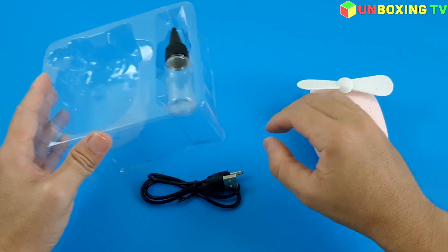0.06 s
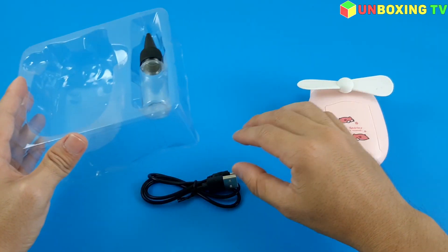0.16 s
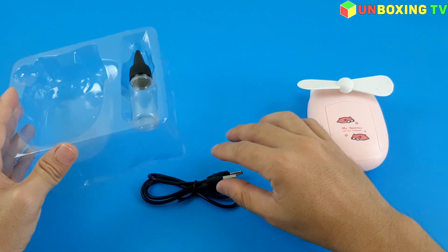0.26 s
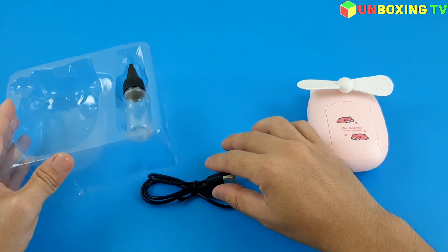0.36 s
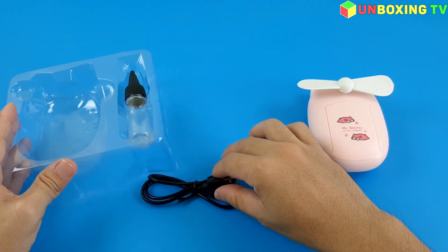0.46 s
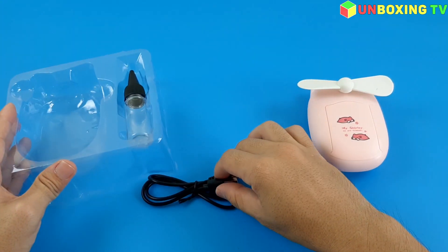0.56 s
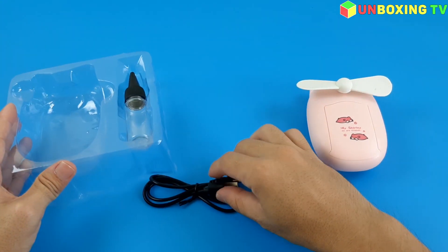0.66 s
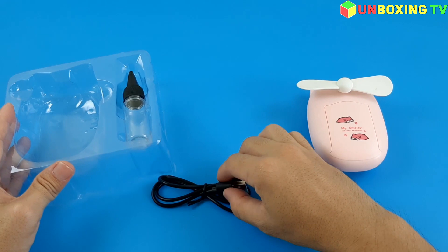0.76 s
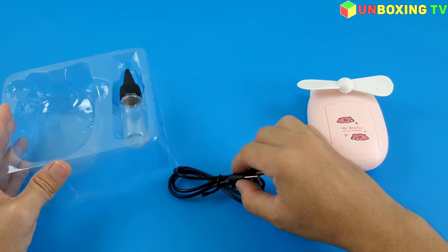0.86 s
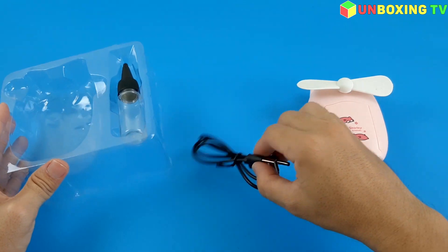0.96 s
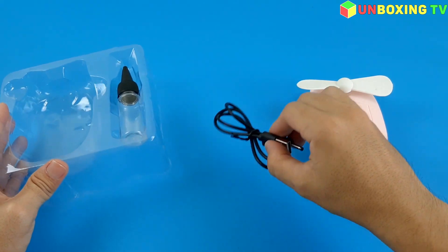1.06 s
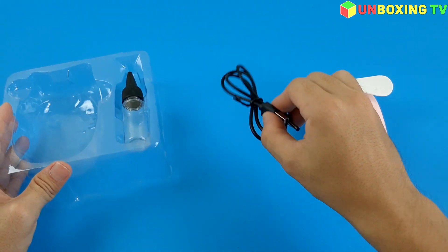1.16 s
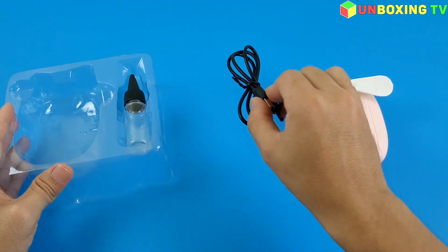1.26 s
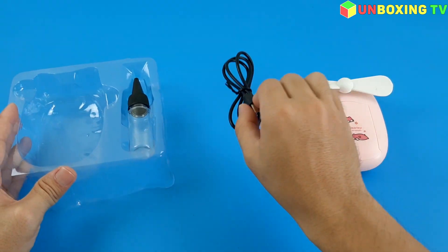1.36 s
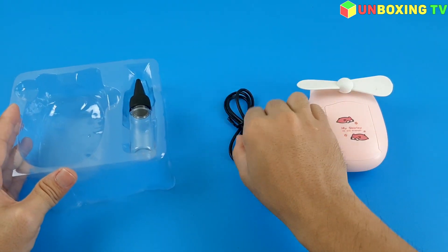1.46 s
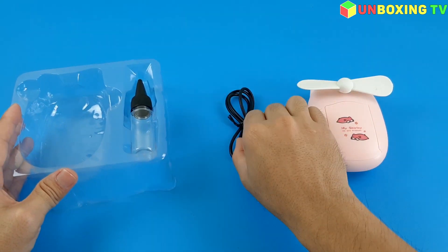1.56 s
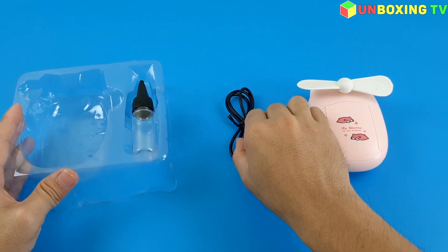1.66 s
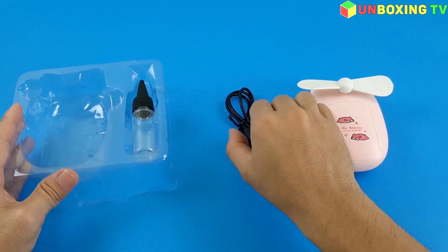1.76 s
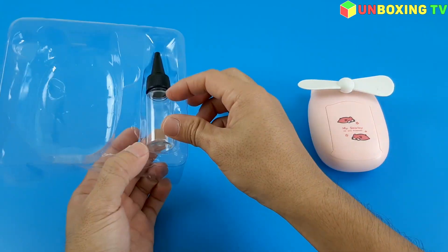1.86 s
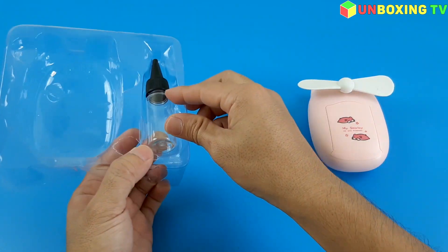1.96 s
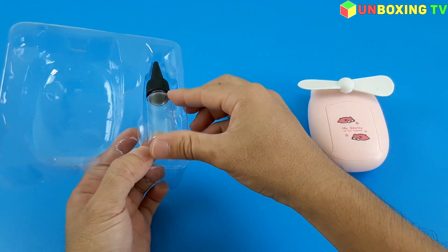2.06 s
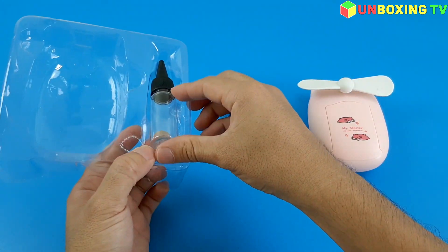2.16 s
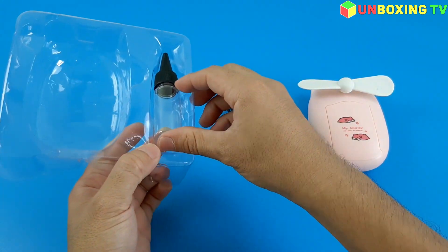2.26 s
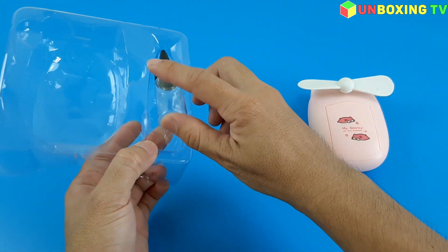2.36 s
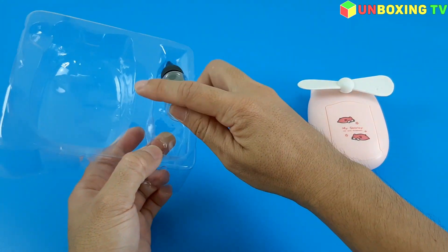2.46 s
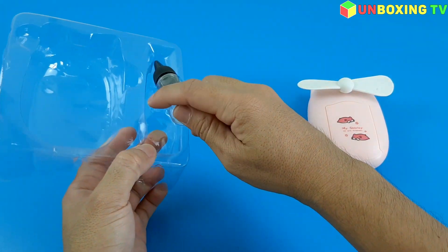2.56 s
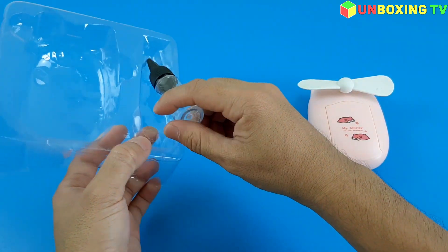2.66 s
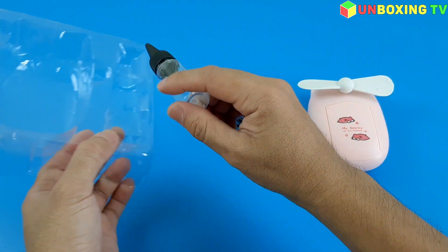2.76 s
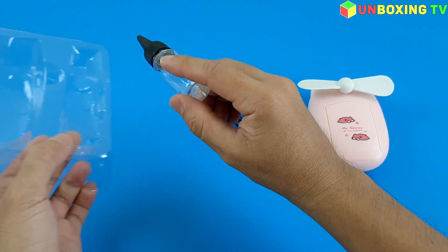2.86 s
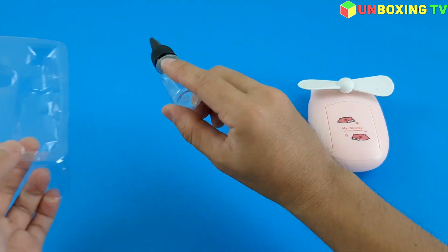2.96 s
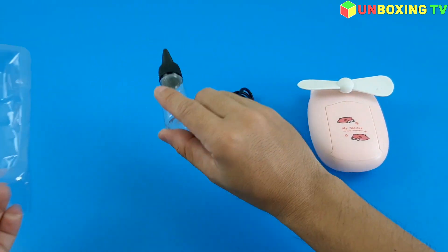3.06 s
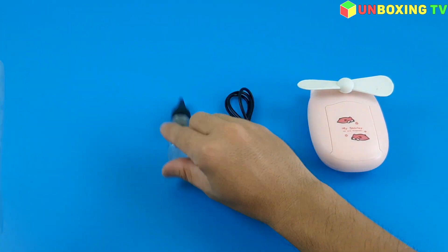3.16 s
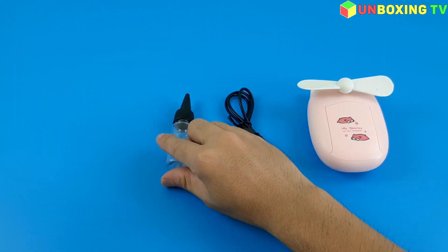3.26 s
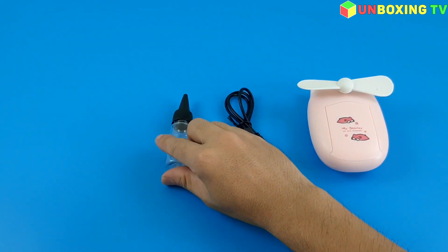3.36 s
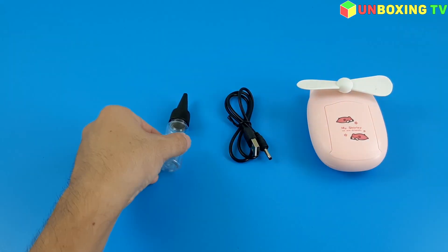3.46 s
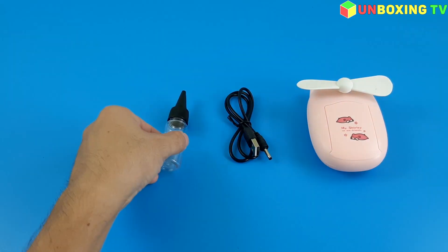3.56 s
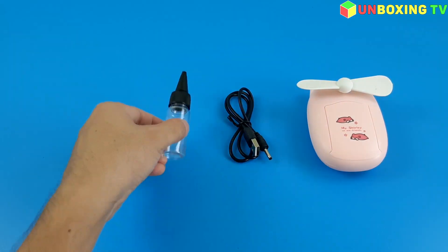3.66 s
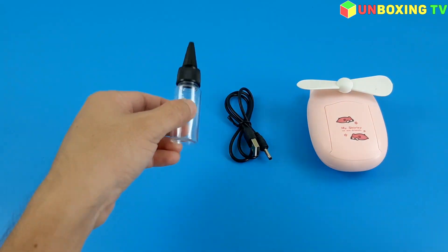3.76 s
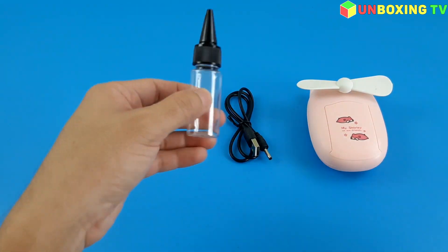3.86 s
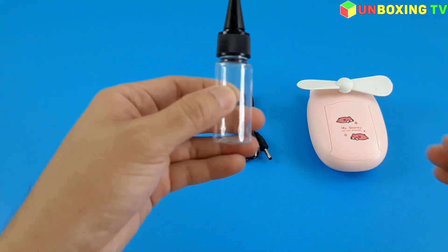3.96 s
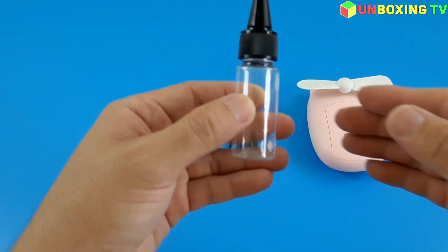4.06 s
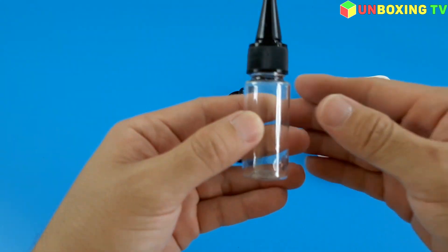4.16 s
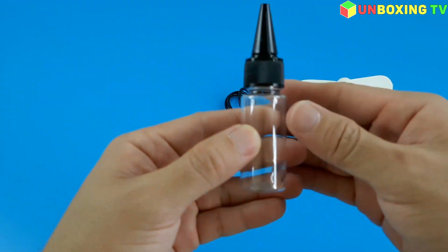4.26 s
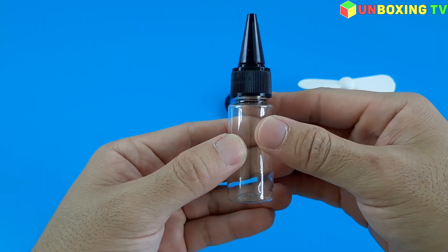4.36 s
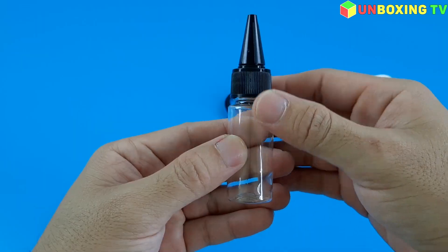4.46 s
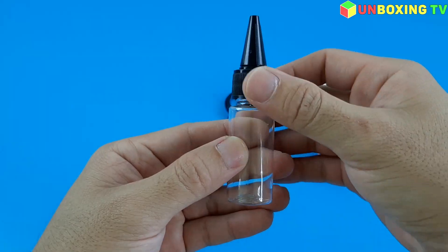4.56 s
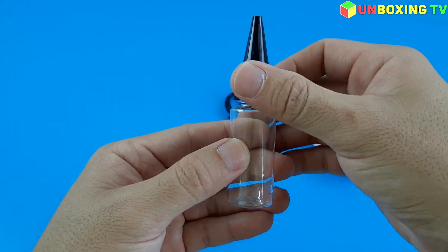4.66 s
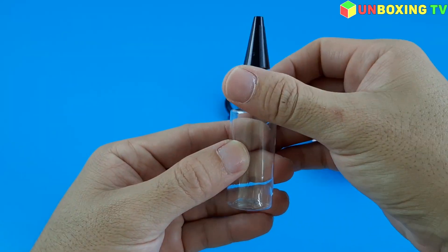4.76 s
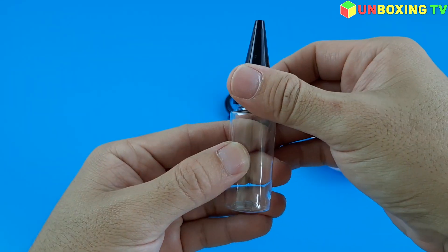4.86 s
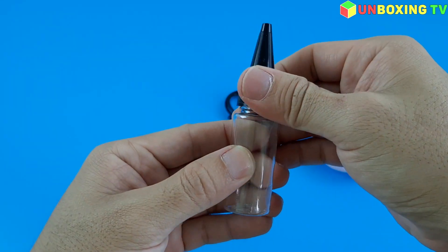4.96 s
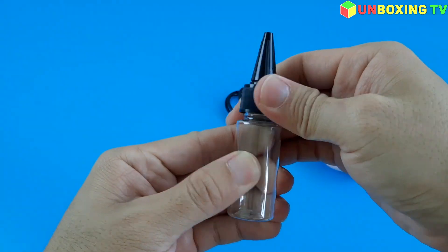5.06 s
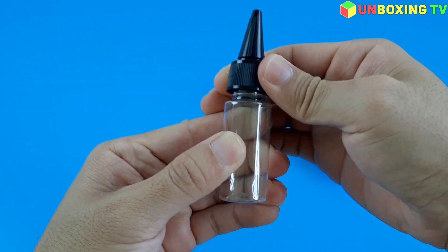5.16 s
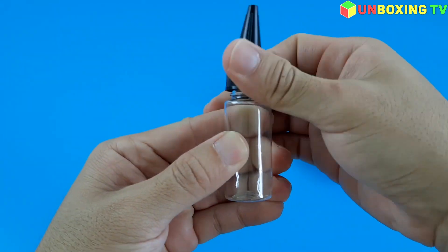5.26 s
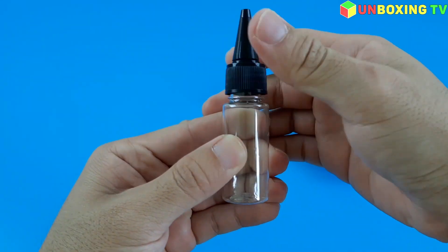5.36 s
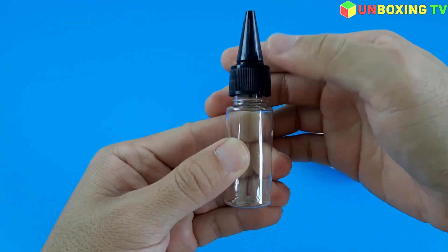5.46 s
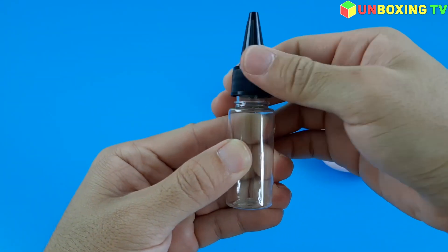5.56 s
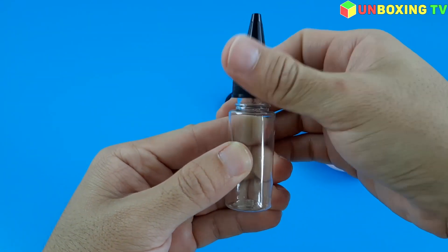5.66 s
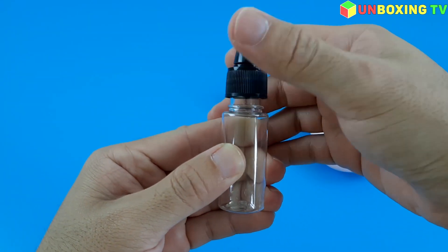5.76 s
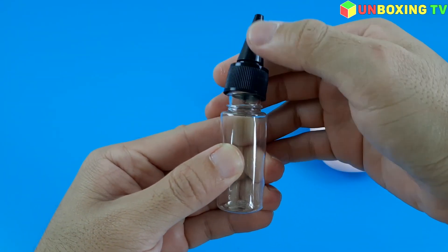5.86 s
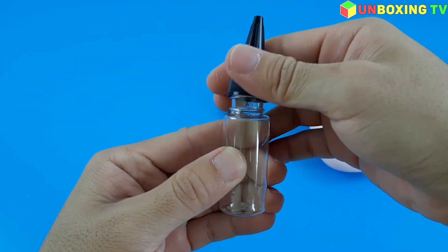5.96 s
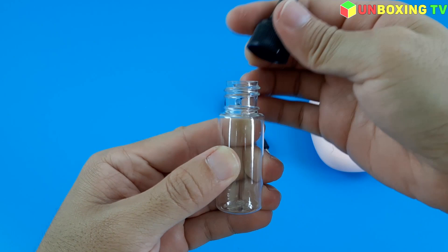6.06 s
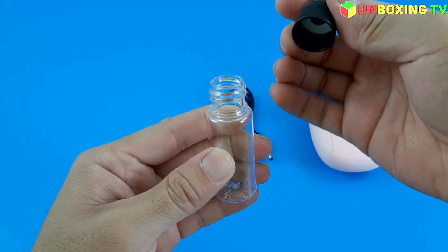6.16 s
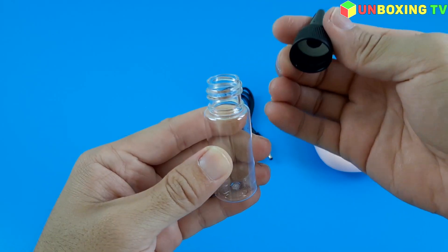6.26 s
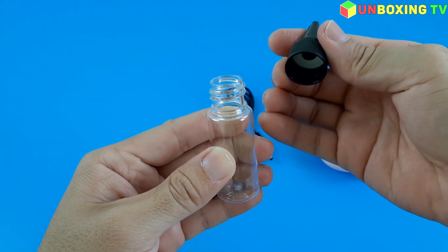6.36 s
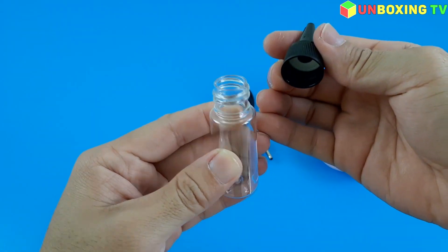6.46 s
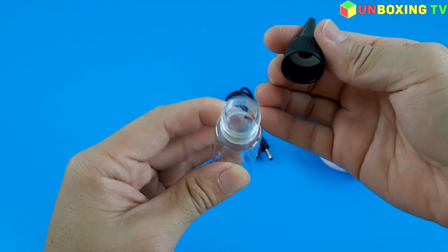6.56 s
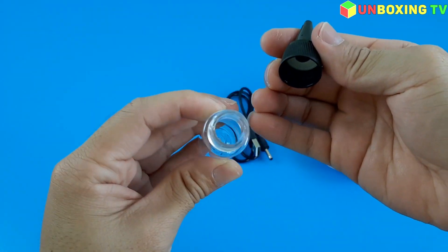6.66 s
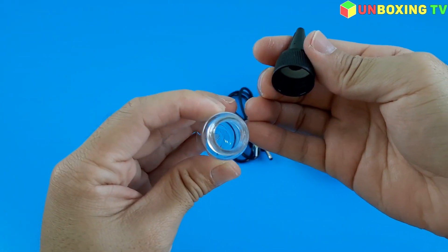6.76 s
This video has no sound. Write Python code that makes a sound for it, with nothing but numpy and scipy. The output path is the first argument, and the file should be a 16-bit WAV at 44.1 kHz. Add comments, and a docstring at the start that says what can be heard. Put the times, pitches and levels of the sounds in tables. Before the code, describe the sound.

Close to the microphone, a thin plastic tray crackles and snaps in irregular bursts, growing denser and louder as a small bottle is worked out of it. The bottle is set down on the table with a sharp knock. After a pause, its plastic cap is unscrewed in steps, ticking along the thread with faint finger rubbing. The room is hard and echoing, with distant traffic rumble and light hiss behind.

```python
"""Far traffic and microphone hiss, then close by, on a table in a hard, echoing room, a thin plastic
tray snaps, buckles and rustles in the hands; each crack rings the film, its wells and the table top.
A small bottle is set down, then its cap is turned off in steps, ticking along the thread.
One echo stops short. During the unscrewing the echo dies twice as fast, and echo, traffic and hiss
sit about an octave higher."""
import sys
import numpy as np
from scipy import signal
from scipy.fft import rfft, irfft
from scipy.io import wavfile

SR = 44100
rng = np.random.default_rng(int(sys.argv[2]) if len(sys.argv) > 2 else 0)


def dump(signal):
    """Clip the signal to [-1, 1] and save it as 16-bit WAV at the path in sys.argv[1]."""
    limited = np.clip(np.atleast_2d(signal).T, -1, 1)
    pcm = np.round(limited * 32767).astype(np.int16)
    wavfile.write(sys.argv[1], SR, pcm)


N = 300762
TIME = np.arange(N) / SR

# Snaps and knocks at the table; level_db sets the middle bands, the three colours are relative to it:
# start_s, level_db, boom_db, hollow_db, sizzle_db, panel_hz, decay_ms
FILM_SNAPS = [(0.468, -15.5, -2, -17.5, -8, 1147, 7.5), (0.475, -17, -15.5, -3.5, -2.5, 1228, 7.5),
              (0.492, -18, -8, -24, -2, 1280, 6.7), (0.534, -22, -10, -17, -22.5, 1217, 3.2),
              (0.556, -22, -10.5, -26, -14, 966, 4.4), (0.638, -36, 5, -14.5, -18, 1192, 2.8),
              (0.729, -34, -7, -18.5, -16.5, 1700, 4.6), (0.811, -34.5, -7.0, -9.5, -4, 1500, 5.5),
              (0.924, -18.5, -11, -16.5, 0.5, 1313, 7.5), (1.014, 9.5, -22.5, -36.0, 4.5, 1152, 2.5),
              (1.419, -34.5, 5, -1.5, 1.0, 7680, 2.8), (1.424, -29, -6.5, -16, 8.5, 8470, 4.6),
              (1.44, -34, -11, -12.5, -4, 2000, 1.7), (1.456, -18, -22, -10, 5, 7720, 3.3),
              (1.484, -34.0, -7.5, -18.5, 15, 8500.0, 2.9), (1.512, -5.5, -12.5, -18.5, 3, 8940, 6.5),
              (1.519, -13.5, -12.5, -24, -1, 1612, 4.0), (1.544, -16, 2, -7.5, 9.5, 5250, 7.5),
              (1.57, -24, -3.5, -13.5, 11.5, 8750, 1.9), (1.579, -7, -29.5, -22, 3, 8260, 5.1),
              (1.597, -9, -18, -29, -1.5, 1135, 2.7), (1.666, -10.5, -29, -13, 5.5, 8160.0, 3.4),
              (1.689, -18.5, -11, -31, -3.5, 1070.0, 1.8), (1.713, -11.5, -29, -22, 4.5, 9200, 3.3),
              (1.721, -14, -27.5, -10, 7.5, 9360, 4.7), (1.729, -12.5, -13.5, -14, -8, 1120, 1.2),
              (1.864, -23, -5, -11, -14.5, 1000.0, 4.2), (1.897, -13.5, -1.5, -10.5, -30.5, 2250.0, 5.2),
              (1.908, -19, -13, 9.5, -7, 1006, 1.3), (1.949, -32.5, 20, 9.5, 8, 1280.0, 0.83),
              (1.967, -22.5, -15, -16.5, -12.5, 1098, 5.9), (2.009, -8, -25, -5, -4.0, 6970, 3.6),
              (2.021, -9, -3.5, -33, -6.5, 2370.0, 2.5), (2.029, -2.5, -22, -20.5, -18, 1230.0, 0.83),
              (2.037, -8, -10.5, -3, -20.5, 1130.0, 1.8), (2.078, -2.0, -3.5, -7, -2, 1090.0, 5.2),
              (2.082, 4, -36.0, -2.5, -12, 2240.0, 1.5), (2.092, -8, -6, -15, 1, 1100.0, 4.6),
              (2.104, 1, -32, -14, -2.5, 4130.0, 3.3), (2.118, -2.5, -16.0, 1.5, -17.0, 1340.0, 1.5),
              (2.245, -16.5, -14, -26, -1.5, 2650, 7.5), (2.259, -15.5, -33, -22.5, -19.5, 2387, 1.4),
              (2.297, -20.5, -9, -9.5, -7.0, 1200.0, 2.5), (2.326, -16, -20, -33.5, 1.5, 987, 1.9),
              (2.344, -9.5, -9.5, -37.5, -20.5, 1930.0, 2.1), (2.368, -33.5, 6.5, -2.5, 10, 1041, 6.0),
              (2.393, -8, -9.5, -2.5, -41.5, 1920, 2.7), (2.471, -38, -14, 15, -29.5, 1333, 2.9),
              (2.527, -34.5, -9.5, -11, 2, 1100.0, 3.7), (2.551, -23, -14, -16, -9.5, 1247, 1.9),
              (2.584, -26, -14, -3, 0.5, 1297, 3.7), (2.598, -15.5, 2, -32.5, -13.5, 1136, 7.4),
              (2.624, -16.5, -1.5, -12, -4, 1331, 1.5), (2.651, 6, -16.5, -29, -8.5, 2000.0, 3.7),
              (2.666, -15, 4, -3, 3, 2357, 0.84), (3.076, -41.5, -17.5, -35, 7.5, 1440.0, 2.5),
              (3.249, 12.5, -6, -20.5, 3.5, 4840.0, 1.4), (3.26, 4.5, -0.5, -1.5, -11.0, 1570.0, 6.6),
              (3.718, -47, -19, -10, 3, 1766, 5.0), (3.799, -40, -21.0, -31, -9.5, 2020, 4.9)]
# Borders of a snap's boom, body, edge and sizzle: border_hz
SNAP_BORDERS_HZ = [140, 700, 2200, 5500, 14000]
# Resonances of the tray, the air in its wells, the table top, the room's low boom and the cap:
# pitch_hz, width_hz, gain_db
TRAY_MODES = [(1400, 300, -6.5), (2328, 210, 7), (3606, 980, -2.5), (5800, 360, 4.5), (8600, 3350, -4)]
WELL_MODES = [(706.7, 54, 5.5), (1100, 140, -14.5)]
TABLE_MODES = [(226, 25, 0), (396.3, 23, 10.5), (514, 73, 3)]
ROOM_MODE = [(150, 13, 3)]
CAP_MODES = [(4350, 1070, -7), (7000, 440, 14.5), (14500, 1060, 6.5)]
# Film dragged and flexed, one list a gesture: time_s, level_db, brightness_db
RUSTLE_GESTURES = [
    [(0.44, -54, 0), (0.518, -56, -7.5), (0.64, -61.5, 7), (0.71, -67.5, 12.5), (0.858, -42, 0),
     (0.95, -38, -0.5)],
    [(1.4, -57.5, 1.5), (1.48, -54.5, -14.5), (1.6, -60, 0), (1.926, -41, -5), (2.062, -18, -7.5),
     (2.216, -29, -3), (2.392, -39, -18), (2.66, -40.5, -0.5)],
    [(3.66, -61.5, 4), (3.9, -65, 7)],
]
# Cap jumping along its thread: start_s, level_db, knock_db (relative), decay_ms
CAP_JUMPS = [(5.1304, -27, -25, 1.1), (5.245, -28.5, -11, 1.8), (5.3163, -13.5, -21, 4),
             (5.336, -19.5, -14.5, 1), (5.3557, -23, -9, 2.5), (5.388, -21.5, -15, 3),
             (5.4038, -24, -11, 0.51), (5.463, -17, -17, 3.2), (5.476, -22, -20.5, 2.4),
             (5.49, -25, -21, 1.2), (5.6003, -8, -13.5, 1.6), (5.7352, -2.5, -15, 1.9),
             (5.7391, -10, -41, 1.2), (5.856, -4.5, -19.5, 2.9), (5.865, -10, -17, 1.8),
             (5.901, -30, -2, 1.14), (6.0807, -27.5, -5, 1.48), (6.0902, -24.5, -11, 1.57)]
# Cable, film and cap ribs under the fingers: start_s, length_s, level_db, centre_hz
FINGER_STROKES = [(0.662, 0.036, -47, 5350), (0.798, .13, -50, 8770), (0.814, 0.087, -51.5, 5370),
                  (0.923, 0.014, -22, 8200), (0.932, 0.06, -47, 1400), (5.127, 0.032, -44.5, 4480),
                  (5.122, 0.028, -48.5, 13450), (5.32, 0.092, -54, 7000), (5.456, 0.049, -50, 4830),
                  (5.459, 0.046, -54, 13500), (6.025, 0.047, -52.5, 6820), (6.032, .03, -47, 14500),
                  (6.075, 0.013, -45, 1410), (6.11, 0.048, -53, 7800)]
# Echo of the hard walls: band_hz, t60_s, gain_db
ROOM_BANDS = [(150, 0.55, 11), (496, 0.49, 9.5), (1200, 0.52, 5.5), (2760, 0.56, 4.5), (6000, 0.48, 6),
              (10660, 0.55, 1.5), (14000, 0.42, -3), (16000, 0.63, 2)]
# Engine out in the street, one list a stretch: time_s, pitch_hz, level_db
ENGINE_DRONE = [
    [(3.5, 68, -50.5), (3.572, 67.1, -33), (3.656, 68, -60), (3.72, 71.7, -38), (4.036, 71.3, -28.5),
     (4.342, 70.3, -49), (4.514, 75.6, -31.5), (4.722, 75.7, -29), (4.87, 75.2, -39.5), (5.03, 75.1, -40)],
    [(5.04, 151.7, -40), (5.148, 150, -25.5), (5.592, 158.7, -30), (5.678, 166, -42.5), (5.776, 158, -30.5),
     (5.87, 155, -44.5), (6.26, 150.9, -42)],
    [(6.27, 75.46, -39), (6.49, 73.46, -54), (6.54, 68.7, -33.5), (6.82, 68.04, -46)],
]
# Low rumble, the street plus thumps from handling at the table: time_s, level_db
LOW_RUMBLE = [(0.0, -38.5), (0.4, -43), (0.5, -32), (0.65, -42.5), (1.18, -38), (1.84, -36.5),
              (1.99, -31.5), (2.75, -35), (3.28, -34.5), (3.63, -38.5), (4.29, -38), (4.65, -33.5),
              (5.01, -41.5), (5.17, -36.5), (6.82, -38.5)]
# Spectral shapes of the low rumble and of the steady background, street murmur and microphone hiss:
# frequency_hz, density_db
RUMBLE_SPECTRUM = [(14, -39.5), (24, -19.5), (65, 1.5), (84, -6.5), (103, -12), (166, -8.5), (184, -16.5),
                   (214, -8.5), (237, -19), (270, -17.5), (352, -23), (554, -29), (800, -40), (1040, -47.5),
                   (1760, -120)]
HISS_SPECTRUM = [(350, -31.5), (600, -7.5), (758, -19), (1040, -14.5), (1490, -15), (1880, -17.5),
                 (2240, -18), (2870, -23.5), (5560, -14.5), (9760, -14), (15100, -14), (16000, -16)]

ONSET_DELAY_S = .001   # each crack starts this long after its listed time
ECHO_STOP_S, HIGH_FROM_S, HIGH_TO_S = 3.533, 5.035, 6.268   # high: the stretch an octave up
EDGE_OVER_BODY_DB, BLUNTER_PER_DB = -14, 0.69   # more boom means a heavier, blunter press
SNAP_ROOM_DB, WETTER_PER_DB = -13, 0.2333   # soft snaps are further off and sound wetter
SNAP_RISE, TICK_RISE = .08, 0.087   # swell of a crack, as a share of its decay time
PANEL_Q, PANEL_DB, CREASES_PER_S = 5, 5, 570
KNOCK_HZ, CAP_RING_DB, TICK_DB, CAP_ROOM_DB = 970, -8, -10, -9.5
ROOM_GAP_S = 0.0051
HISS_DB, HIGH_HISS_DB, CUTOFF_HZ = -54, -55.5, 16300


def film_snaps():
    """Each buckle cracks in its own colour; returns the direct sound and what reaches the walls."""
    direct, to_walls = np.zeros((2, N))
    for start_s, level_db, boom_db, hollow_db, sizzle_db, panel_hz, decay_ms in FILM_SNAPS:
        crack = burst(SNAP_RISE * decay_ms, decay_ms, 6000)
        edge = amp(EDGE_OVER_BODY_DB - BLUNTER_PER_DB * boom_db)
        middle = np.hypot(1, edge)
        shares = np.array([amp(boom_db), amp(hollow_db), 1 / middle, edge / middle, amp(sizzle_db)])
        room_db = SNAP_ROOM_DB - WETTER_PER_DB * level_db
        voice = lambda x: film_voice(x, panel_hz)
        strike(direct, to_walls, start_s, crack, voice, amp(level_db) * shares, room_db)
    return direct, to_walls


def film_voice(crack, panel_hz):
    """The buckling panel rings with the whole tray; returns boom, hollow, body, edge and sizzle."""
    panel = modes(crack, [(panel_hz, panel_hz / PANEL_Q, PANEL_DB)])
    film = crack + amp(3.5) * modes(crack, TRAY_MODES) + panel
    borders = zip(SNAP_BORDERS_HZ, SNAP_BORDERS_HZ[1:])
    # signs alternate so that neighbouring bands do not cancel
    boom, *upper = [(-1) ** k * band(film, *pair) for k, pair in enumerate(borders)]
    room_boom = modes(modes(film, ROOM_MODE), ROOM_MODE)   # near 150 Hz, swells just after a knock
    return [boom + modes(film, TABLE_MODES) + room_boom, modes(film, WELL_MODES), *upper]


def film_rustle():
    """Tiny creases of uneven size on sliding noise, heard through the tray."""
    level_db, bright_db = in_time(RUSTLE_GESTURES, quiet=[-120, 0])
    sizes = amp(3.0 * np.minimum(rng.exponential(1, N), 5)) * rng.choice([-1, 1], N)
    creases = sizes * (rng.random(N) < CREASES_PER_S / SR) + amp(-21) * rng.standard_normal(N)
    film = creases + amp(4) * modes(creases, TRAY_MODES + WELL_MODES)
    body, treble = rms_one(band(film, 400, 2500)), rms_one(band(film, 3070, 13000))
    return amp(level_db) * (body + amp(bright_db) * treble)


def cap_ticks():
    """Each jump on the thread is a bright tick, a knock on the bottle and a short ring of the cap."""
    direct, to_walls = np.zeros((2, N))
    voice = lambda x: [band(x, 1700, 17000),
                       band(x, KNOCK_HZ / 1.32, KNOCK_HZ * 1.22),
                       modes(x, CAP_MODES)]
    for start_s, level_db, knock_db, decay_ms in CAP_JUMPS:
        crack = burst(TICK_RISE * decay_ms, decay_ms, 1500)
        gains = amp(level_db) * amp([TICK_DB, knock_db, CAP_RING_DB])
        strike(direct, to_walls, start_s, crack, voice, gains, CAP_ROOM_DB)
    return direct, to_walls


def finger_scrapes():
    """Fingers rasp unevenly, each stroke in its own band."""
    out = np.zeros(N)
    rasp = rng.standard_normal(N) * amp(3.8 * drift(rate_hz=230))
    for start_s, length_s, level_db, centre_hz in FINGER_STROKES:
        arch = np.sqrt(np.clip(1 - (2 * (TIME - start_s) / length_s - 1) ** 2, 0, 1))
        out += amp(level_db) * arch * rms_one(band(rasp, centre_hz / 1.12, centre_hz * 1.12))
    return out


def room_echo(x, speed):
    """The walls answer after a gap, each band dying at its own rate; speed shortens and raises it."""
    t, tail = np.arange(SR) / SR * speed, 0
    band_hz, *columns = np.transpose(ROOM_BANDS)
    for hz in 100 * 2 ** np.arange(0, 7.6, .5):
        t60_s, gain_db = (np.interp(np.log(hz / speed), np.log(band_hz), c) for c in columns)
        noise = band(rng.standard_normal(SR), hz / 2 ** .25, hz * 2 ** .25)
        tail = tail + noise * amp(gain_db - 60 * t / t60_s)
    tail = tail * np.clip(t / ROOM_GAP_S - 1, 0, 1)
    return signal.fftconvolve(x, tail / np.sqrt(np.sum(tail ** 2)))[:N]


def rumble_and_engine(high):
    """Street rumble, handling thumps and a far engine, about an octave up in the high stretch."""
    rumble = np.where(high, coloured(RUMBLE_SPECTRUM, 2.144), coloured(RUMBLE_SPECTRUM, 0.99))
    rumble_db = in_time([LOW_RUMBLE], quiet=[0])[0] + drift(rate_hz=9)
    pitch_hz, engine_db = in_time(ENGINE_DRONE, quiet=[70, -120])
    engine = np.sqrt(2) * np.sin(2 * np.pi * np.cumsum(pitch_hz) / SR)
    return amp(rumble_db) * rumble + amp(engine_db) * engine


def background_hiss(high):
    """The steady background: the street's even mid-band murmur and the microphone's noise floor, brighter and
    slightly softer in the high stretch."""
    raised = amp(HIGH_HISS_DB) * coloured(HISS_SPECTRUM, 1.93)
    return np.where(high, raised, amp(HISS_DB) * coloured(HISS_SPECTRUM, 1))


def strike(direct, to_walls, start_s, crack, voice, gains, room_db):
    """One crack through a body: its parts are mixed into the direct sound and sent to the walls."""
    at = round((start_s + ONSET_DELAY_S) * SR)
    span = slice(at, at + len(crack))
    parts = np.array([peak_one(part) for part in voice(crack)])
    direct[span] += gains @ parts
    # the walls hear the body from all sides, so its ripples average out to a smooth click
    click = np.array(voice(signal.unit_impulse(len(crack))))
    same_energy = np.linalg.norm(parts, axis=1) / np.linalg.norm(click, axis=1)
    to_walls[span] += amp(room_db) * gains * same_energy @ click


def burst(rise_ms, decay_ms, samples):
    """A crack: noise that swells quickly and dies away."""
    ms = 1000 * np.arange(samples) / SR
    swell = (1 - np.exp(-ms / max(rise_ms, .03))) ** 2
    return rng.standard_normal(samples) * swell * np.exp(-ms / max(decay_ms, .2))


def modes(x, table):
    """Resonances in parallel, signs alternating."""
    out = 0
    for k, (hz, width_hz, db) in enumerate(table):
        r = np.exp(-np.pi * width_hz / SR)
        poles = [1, -2 * r * np.cos(2 * np.pi * hz / SR), r * r]
        ring = signal.lfilter([1, 0, -1], poles, x + 1e-18)
        out = out + (-1) ** k * amp(db) * (1 - r * r) / 2 * ring
    return out


def band(x, low_hz, high_hz):
    """Band-pass."""
    return signal.sosfilt(signal.butter(2, [low_hz, high_hz], "band", fs=SR, output="sos"), x)


def coloured(spectrum, pitch_ratio):
    """Unit-rms noise with the given spectrum, shifted by pitch_ratio."""
    points_hz, points_db = np.transpose(spectrum)
    hz = np.maximum(np.fft.rfftfreq(N, 1 / SR), 1) / pitch_ratio
    db = np.interp(np.log(hz), np.log(points_hz), points_db)
    return rms_one(irfft(rfft(rng.standard_normal(N)) * amp(db), N))


def drift(rate_hz):
    """A random wander between points of spread 1."""
    knots = rng.standard_normal(int(N / SR * rate_hz) + 2)
    return np.interp(TIME * rate_hz, np.arange(len(knots)), knots)


def in_time(tables, quiet):
    """Columns over time; between the tables each rests at its quiet value."""
    out = np.tile(np.array(quiet, float)[:, None], N)
    for rows in tables:
        time_s, *columns = np.transpose(rows)
        inside = (TIME >= time_s[0]) & (TIME <= time_s[-1])
        out[:, inside] = [np.interp(TIME[inside], time_s, c) for c in columns]
    return out


def amp(db):
    """Decibels to gain."""
    return 10 ** (np.asarray(db) / 20)


def rms_one(x):
    """Scale to unit rms."""
    return x / np.sqrt(np.mean(x ** 2) + 1e-20)


def peak_one(x):
    """Scale to a peak near 1."""
    return x / (np.mean(np.sort(np.abs(x))[-20:]) + 1e-12)


def scene():
    """One microphone: tray and cap close up, the room around them, the street beyond."""
    snaps, tray_to_walls = film_snaps()
    ticks, cap_to_walls = cap_ticks()
    rubbing = film_rustle() + finger_scrapes()
    to_walls = tray_to_walls + amp(-15) * rubbing
    early, late = TIME < ECHO_STOP_S, TIME > HIGH_FROM_S
    high = late & (TIME < HIGH_TO_S)
    echo = room_echo(to_walls * early, speed=1) * early   # this tail stops short
    echo += room_echo(to_walls * ~early * ~late, speed=1)
    echo += room_echo(to_walls * late + cap_to_walls, speed=2) * (TIME < HIGH_TO_S)
    return (snaps + ticks + rubbing + echo + rumble_and_engine(high) + background_hiss(high))[None]


def record(dry):
    """The loudest cracks overload; the highest treble is cut."""
    low_pass = signal.cheby2(14, 53, CUTOFF_HZ, fs=SR, output="sos")
    return signal.sosfilt(low_pass, np.clip(dry, -1, 1))


dry = scene()
out = record(dry)
dump(out)
```